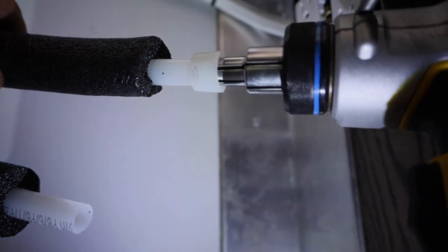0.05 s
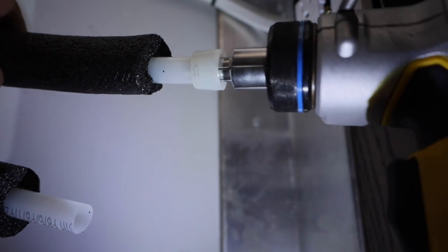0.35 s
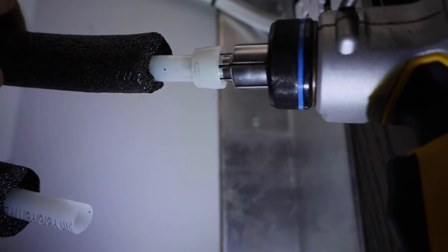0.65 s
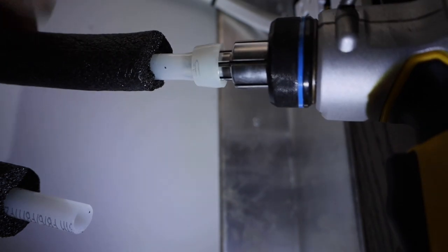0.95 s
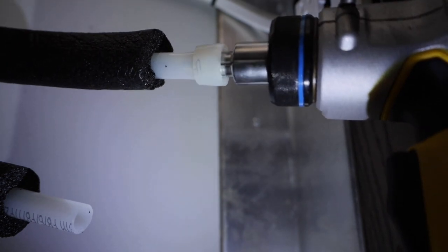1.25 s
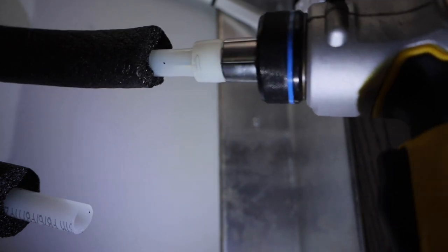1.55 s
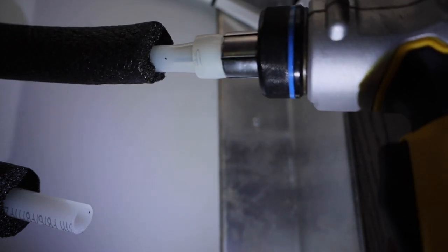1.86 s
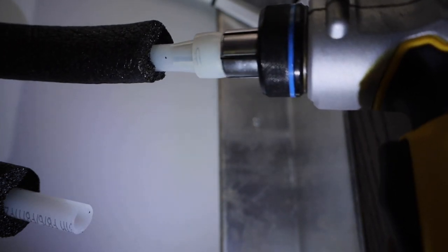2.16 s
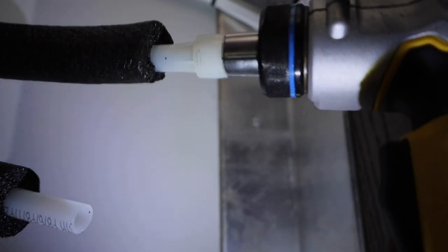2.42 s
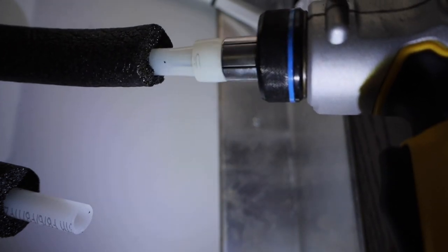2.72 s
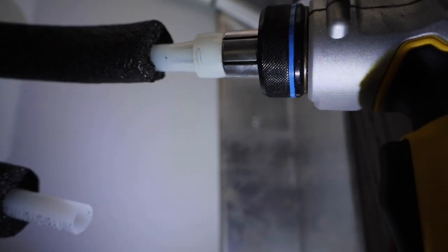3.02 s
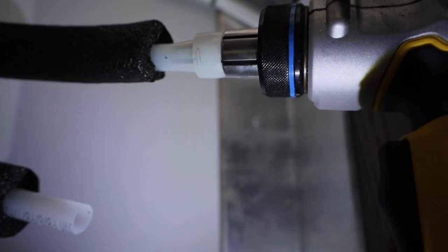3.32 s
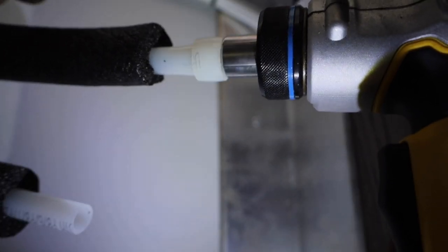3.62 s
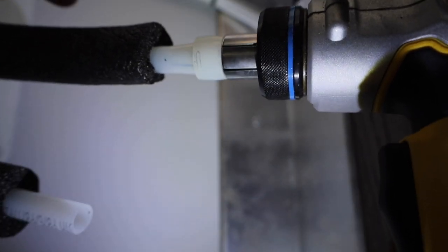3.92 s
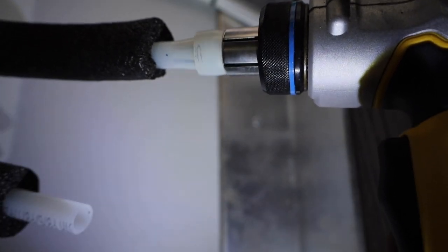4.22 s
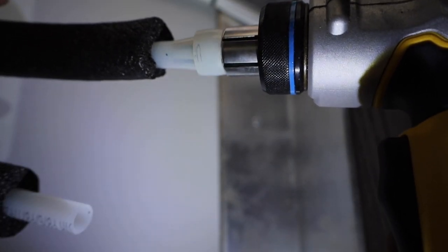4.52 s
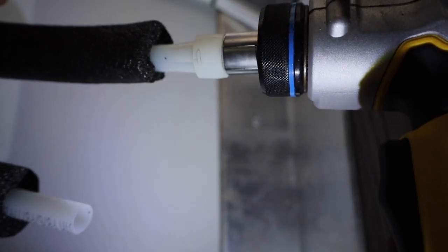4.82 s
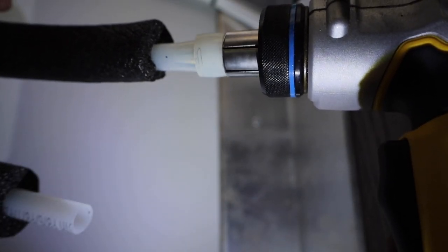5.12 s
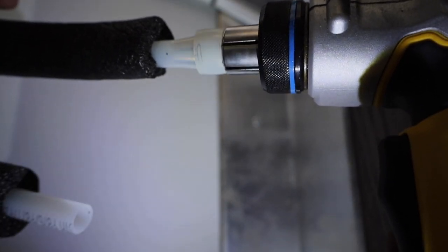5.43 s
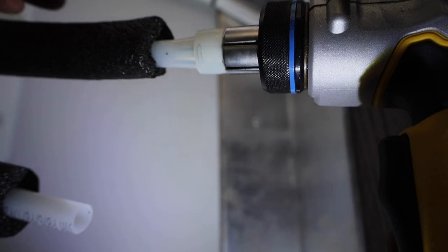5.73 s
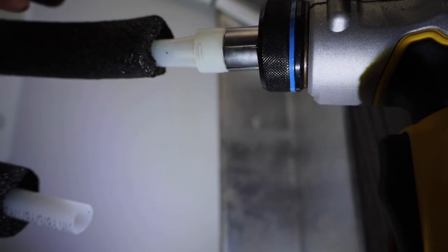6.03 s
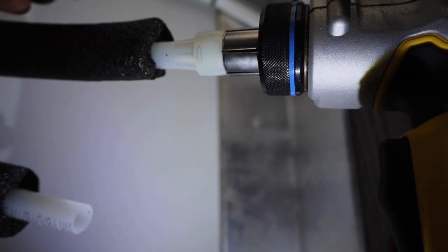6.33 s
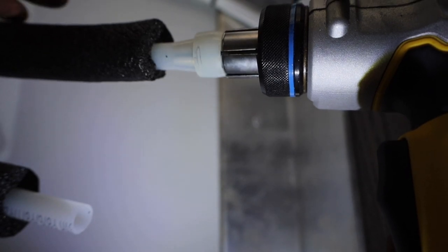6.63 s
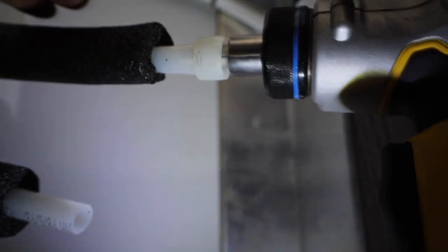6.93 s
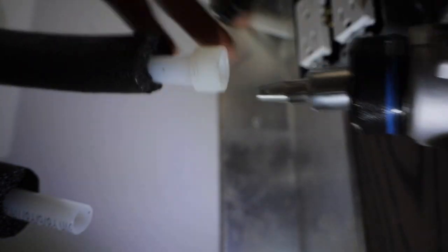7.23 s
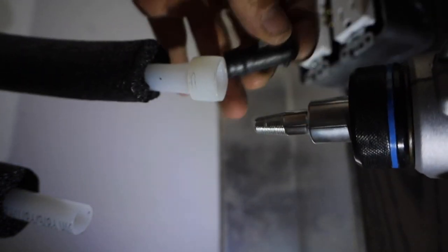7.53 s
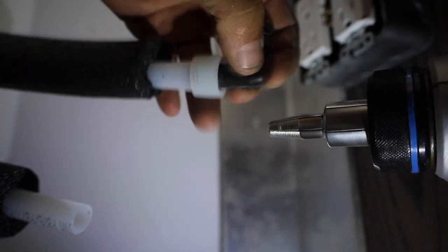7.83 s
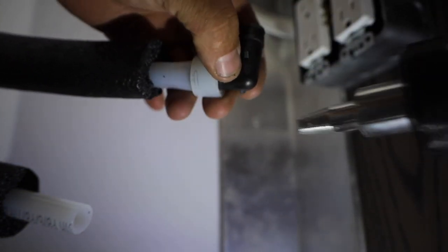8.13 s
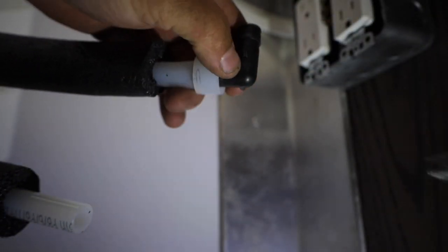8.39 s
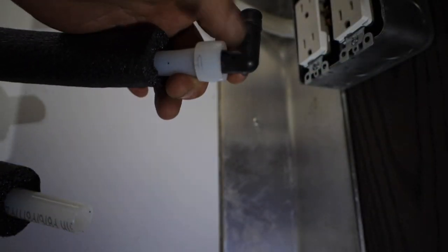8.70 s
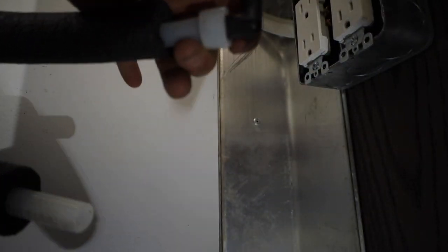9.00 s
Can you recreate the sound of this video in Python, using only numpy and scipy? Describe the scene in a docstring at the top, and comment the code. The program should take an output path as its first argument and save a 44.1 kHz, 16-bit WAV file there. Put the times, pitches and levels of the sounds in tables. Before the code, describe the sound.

A cordless expander stretches a plastic pipe end in a workshop, close to the microphone. Its geared motor whines, sags and grinds under load, then the steel jaws snap shut and the pitch recovers, seven snaps in all. The motor stops abruptly with a click and the tool slides out. The pipe thumps, and a fitting is pushed in with knocks, rubbing and faint squeaks over a low room hum.

```python
"""A cordless expander stretching a plastic pipe end in a workshop, close to one microphone.
The tool is already running: its geared motor sags and grinds as the cam spreads the jaws, then they
snap shut and the motor runs free again, seven snaps in all, with the odd knock of the pipe.
Near seven seconds the motor is braked and the tool slides out. The pipe is bumped and a fitting
is pushed in, rubbing and squeaking, while the low hum of the room comes up."""
import sys
import numpy as np
from scipy import signal
from scipy.fft import rfft, irfft, next_fast_len
from scipy.io import wavfile

SR = 44100
rng = np.random.default_rng(int(sys.argv[2]) if len(sys.argv) > 2 else 0)


def to_wav(sig):
    """Store sig (one row per channel, or 1-D mono) as 16-bit WAV at the path in sys.argv[1].

    Samples outside -1..1 are clipped; the rate is SR.
    """
    pcm = np.clip(np.atleast_2d(sig), -1, 1) * 32767
    pcm = np.round(pcm).astype(np.int16)
    wavfile.write(sys.argv[1], SR, pcm.T)  # frames by channels


N = 399410
TIME = np.arange(N) / SR
FREE_HZ, STOP_S = 304.6, 6.976  # shaft speed running free; when the trigger is let go

# Turns of the cam. Each row: jaws meet the pipe and jaws snap shut in seconds, shaft speed lost early
# and late in the stretch in Hz, then trims in dB for the drive, the loaded whine and the snap.
STROKES = [(-0.6, 0.0434, 35.2, 34.93, -0.5, 0.5, -5), (0.285, 1.205, 53.5, 40.12, 0.5, -1, -5),
           (1.478, 2.372, 54.16, 47.44, -1.0, 1, -5), (2.777, 3.5009, 42.52, 44.02, -0.57, -0.5, -5),
           (3.95, 4.6146, 35.9, 43, -0.05, 1.5, -3.5), (5.094, 5.72, 32.35, 41.9, 0, 0.5, -4.5),
           (6.221, 6.822, 32.32, 41.74, 0.5, -0.4, -5.5)]
# Spectrum of a hard snap. Each row: frequency in Hz, relative level in dB.
SNAP = [(60, -31.5), (150, -17.5), (300, -1.5), (600, -9.5), (1300, -2.5), (2500, 0), (4000, 5),
        (6500, 5.5), (9000, -3), (12000, -9.5), (16000, -19)]


def motor(dip_db=4.5, dip_s=0.066, whine_dip_db=7, whine_dip_s=0.097, brake_s=0.024, fade_s=0.032):
    """The geared drive: briefly quiet after each snap, its whine last to return, then braked hard."""
    speed, load, since_snap = strain()
    _, snap_s, _, _, drive_db, whine_db, _ = np.transpose(STROKES)
    stroke = np.searchsorted(snap_s[:-1], TIME)
    braking = np.maximum(TIME - STOP_S, 0)
    speed = speed * np.exp(-braking / brake_s)
    turns = np.cumsum(speed) / SR
    effort_db = drive_db[stroke] - 0.58 + 0.97 * since_snap  # louder as the cam presses on
    fade = np.exp(-(braking / fade_s) ** 2)
    level = amp(effort_db - dip_db * np.exp(-(since_snap / dip_s) ** 4)) * fade
    whine_gain = amp(whine_db[stroke] * load - whine_dip_db * np.exp(-(since_snap / whine_dip_s) ** 4))
    return level * (whine_gain * whine(speed, turns, load) + whistles(turns, load) + rattle(turns, load))


def strain(full_load_sag_hz=42, bite_s=.2, let_go_s=.016, recover_s=.033):
    """The pipe drags the motor down until the cam lets go: shaft speed, load, seconds since a snap."""
    sag, load, since_snap = np.zeros(N), np.zeros(N), TIME + 1
    for meet_s, snap_s, early_hz, late_hz, *_ in STROKES:
        grip = 1 - np.exp(-(np.maximum(TIME - meet_s, 0) / bite_s) ** 2)
        release = np.exp(-np.maximum(TIME - snap_s + let_go_s, 0) / recover_s)
        drag = np.interp(TIME, [meet_s, snap_s], [early_hz, late_hz]) * grip * release
        sag += drag
        load += np.minimum(drag / full_load_sag_hz, 1) * (TIME < snap_s)
        since_snap = np.where(TIME >= snap_s, TIME - snap_s, since_snap)
    return FREE_HZ - sag, load, since_snap


def whine(speed, turns, load, free_lift_db=1, buzz_lift_db=2, wander_db=1.23, flutter=0.18):
    """Motor and gear tones follow the shaft; straining teeth mesh unevenly and smear the high ones."""
    # Whole multiples come from the motor, the others from the gears.
    # Each row: multiple of shaft speed, relative level in dB running free and under load.
    orders = [(1, -43, -44), (1.74, -71, -44), (2, -42, -66), (2.36, -68, -47), (3, -41, -46),
              (3.61, -47, -35), (4, -38, -44), (4.47, -43, -45), (5, -34, -34), (6, -47, -43),
              (7.12, -55, -40), (8.56, -35.5, -36), (10.55, -40, -41), (10.96, -41, -41), (12, -39, -41),
              (12.25, -67, -40), (13, -40, -43), (14.34, -53, -43), (15, -36, -32), (15.3, -53, -42),
              (15.72, -43, -37), (16.72, -51, -37), (17.11, -52, -36), (17.725, -34, -25), (18, -43, -46),
              (20, -38, -38), (21, -40, -45), (22, -45, -55), (23.23, -64, -40), (24.28, -72, -34),
              (24.78, -64, -38), (25, -46, -40), (25.88, -71, -39), (26.28, -58, -37), (30, -42, -43),
              (31, -46, -46), (34, -45, -43), (34.84, -69, -40), (35.45, -80, -42), (36, -49, -47),
              (38, -49, -48), (41, -51, -51), (43.39, -82, -41), (49, -52, -60)]
    # The weaker motor harmonics in between. Each row: frequency in Hz, relative level in dB.
    buzz = [(2000, -48), (4500, -47.5), (7000, -52), (10000, -51.5), (12000, -52), (15500, -55.5)]
    out, shaft_hz = np.zeros(N), np.arange(240, 320)
    rough_rad = 0.11 + 0.18 * load
    gliding = np.sin(np.pi * load)  # tones break up while they sweep across many small modes
    smear_rad = .011 * load + .022 * gliding
    strained = load ** 0.49
    depth = np.minimum(TIME / STOP_S, 1)  # the head works deeper into the pipe
    for order, free_db, loaded_db in orders:
        geared = abs(order - round(order)) > .1
        multiple = order if geared else round(order)
        shallow, deep = (np.interp(speed, shaft_hz, singing(order * shaft_hz, end)) for end in (0, 1))
        ring = shallow + (deep - shallow) * depth
        ring /= np.sqrt(np.average(ring ** 2, weights=load > .85))  # rms gain 1 near full load
        level = amp(free_db + free_lift_db) * (1 - load) + amp(loaded_db) * strained * ring
        breakup_db = gliding * (5 if geared else 1.5)
        level *= amp(wander_db * waver(2.01) + breakup_db * (waver(35) - .5))
        slip = rough_rad * waver(70) + geared * order * smear_rad * waver(450)
        level *= 1 + flutter * waver(35)
        out += level * np.cos(2 * np.pi * (multiple * turns + rng.random()) + slip)
    strong = [round(order) for order, *_ in orders if abs(order - round(order)) <= .1]
    lift, jitter = amp(buzz_lift_db * load), rough_rad * waver(50)
    for k in np.setdiff1d(np.arange(7, 60), strong):
        level = lift * amp(read(buzz, k * FREE_HZ))
        out += level * np.cos(2 * np.pi * (k * turns + rng.random()) + jitter)
    return np.sqrt(2) * out


def singing(hz, depth):
    """Gain of a tone sweeping through sharp modes of head and gearbox, at a depth (0-1) in the pipe."""
    # Each row: centre in Hz, width in Hz, peak in dB, dB gained at full depth.
    modes = [(939, 45, 7.5, 0.5), (1369, 86, 13, 2.5), (3880, 45, 11, -5.5), (4638, 85, 11, -0.5),
             (6350, 60, 7, -0.5), (6560, 90, 5.5, 0), (9170, 110, -2, 6)]
    return amp(sum(resonance(hz, centre, width, db + depth * gain) for centre, width, db, gain in modes))


def whistles(turns, load):
    """Gear teeth whistle as soon as they bear load: narrow noise bands riding on the shaft speed."""
    # Each row: multiple of shaft speed, width in Hz, relative level in dB.
    bands = [(24.2, 280, -39), (35, 340, -38.5), (43.9, 380, -42.5)]
    out = np.zeros(N)
    for order, width, db in bands:
        phase = 2 * np.pi * order * turns
        out += amp(db) * (waver(width) * np.cos(phase) + waver(width) * np.sin(phase))
    return load ** 0.33 * out


def rattle(turns, load, free_db=-25, loaded_db=-20, throb=0.11, flicker_db=1):
    """Gear teeth chatter in the housing, bunched once a shaft turn, and grind brighter under load."""
    # Chatter running free and under load. Each row: frequency in Hz, relative level in dB.
    free_spectrum = [(40, -60), (110, -30.5), (230, -15.5), (450, -13.5), (700, -8.5), (1150, -3),
                     (1800, -8.5), (3200, -4.5), (5000, -8.5), (8000, -13), (8800, -17), (10300, -17.5),
                     (11500, -23.5), (15500, -32)]
    loaded_spectrum = [(40, -59), (110, -32), (250, -27.5), (450, -16), (700, -9.5), (1250, -7), (2600, -6),
                       (4400, -1.5), (5400, -7.5), (6700, -4.5), (8000, -10.5), (9400, -16), (12000, -17),
                       (15500, -29)]
    # Housing resonances. Each row: centre in Hz, width in Hz, peak in dB.
    housing = [(320, 127, 4.5), (970, 180, -4), (1215, 480, 5.5), (1886, 200, 3.5), (3230, 109, 3),
               (3860, 400, -1), (6560, 350, 2)]
    beat = (1 + throb * np.cos(2 * np.pi * turns)) * amp(flicker_db * waver(160))
    free = colour(beat * grains(N, spread_db=0), free_spectrum, peaks=housing)
    loaded = colour(beat * grains(N, spread_db=3.5), loaded_spectrum, peaks=housing)
    share = np.clip(load, 0, 1)
    return amp(free_db) * np.sqrt(1 - share) * free + amp(loaded_db) * np.sqrt(share) * loaded


def brake(click_db=-24, click_s=.005, catch_s=6.985, catch_db=-15.5):
    """The trigger clicks, then the brake catches the gears and the gearbox rings."""
    # Gearbox modes. Each row: frequency in Hz, relative level in dB, seconds to fall 60 dB.
    gearbox = [(1170, 4, 0.08), (1320, -6, 0.081), (600, -23, .1)]
    out, t = np.zeros(N), np.arange(SR // 20) / SR
    add(out, STOP_S, amp(click_db) * colour(rng.standard_normal(len(t)), SNAP) * np.exp(-t / click_s))
    add(out, catch_s, amp(catch_db) * ringing(gearbox))
    return out


def jaws(crack_db=6, crack_s=0.0012, ring_db=-3, rebound_s=0.0061, rebound_db=-9, reset_db=-33):
    """Steel jaws slam shut, rebound once and ring briefly; a light scrape follows as the head resets."""
    out, t = np.zeros(N), np.arange(SR // 20) / SR
    ring_t60 = [(250, 0.38), (1000, 0.048), (5000, 0.071), (13000, 0.056)]
    for _, start, *_, db in STROKES:
        crack = colour(rng.standard_normal(len(t)), SNAP) * np.exp(-t / crack_s)
        crack = low_cut(crack, hz=220)  # the crack carries little bass
        add(out, start, amp(db + crack_db) * crack)
        add(out, start + rebound_s, amp(db + rebound_db) * crack)
        add(out, start, amp(db + ring_db) * burst(SNAP, ring_t60))
        scrape = colour(grains(SR // 40, spread_db=9), [(1000, -1), (8000, -6), (13000, 5), (16000, -20)])
        add(out, start + 0.078, amp(reset_db) * scrape * np.hanning(len(scrape)))
    return out


def handling(direct=0.37, direct_s=0.0072):
    """Knocks ring the pipe, and so do the tiny slips of plastic rubbing on steel, plastic and skin."""
    # Pipe, tool and fitting knock. Each row: start in seconds, level in dB, tilt in dB per octave.
    knocks = [(1.382, -30, -1.5), (4.95, -29.5, 0), (5.064, -35, 2), (7.158, -39.5, 3.5), (7.27, -29.5, -3),
              (7.627, -30.5, -2.5), (7.675, -30.5, -2.5), (7.817, -38, 1.5), (7.863, -20, -1.5),
              (7.871, -16.5, 2.1), (8.204, -34, -3), (8.634, -53, -4)]
    # Rubs. Each row: start and length in seconds, level in dB, tilt in dB per octave.
    rubs = [(7.018, 0.1, -31, -1), (7.12, 0.04, -30, -2.5), (7.332, 0.016, -45.5, 6),
            (7.639, 0.11, -38.5, -1.5), (7.755, 0.089, -45.5, 3), (7.854, 0.021, -24, 2.5),
            (7.924, 0.12, -45, 7), (8.194, 0.14, -46.5, 7), (8.276, 0.035, -37.5, 5.5),
            (8.329, 0.2, -56, 7), (8.654, 0.4, -51, 0.5)]
    # Spectrum of a knock. Each row: frequency in Hz, relative level in dB.
    spectrum = [(50, -38), (130, 0), (220, -7.5), (320, -0.5), (450, -2.5), (900, 5.5), (1500, 1),
                (2400, -2.5), (3500, -11), (5500, -11.5), (9000, -24.5), (16000, -38)]
    # Its decay. Each row: frequency in Hz, seconds to fall 60 dB.
    t60s = [(150, 0.78), (320, 0.32), (1000, 0.21), (2500, 0.12), (6000, 0.11), (14000, .05)]
    # Pipe resonances. Each row: centre in Hz, width in Hz, peak in dB.
    pipe = [(319, 39, 13.5), (603, 60, 3), (1050, 240, 1), (1320, 90, 3.5), (2250, 100, 2.5)]
    out, t = np.zeros(N), np.arange(SR // 2) / SR
    attack = 1 + direct * np.exp(-t / direct_s)
    for start, db, tilt_db in knocks:
        add(out, start, amp(db) * burst(spectrum, t60s, tilt_db, pipe) * attack)
    for start, length, db, tilt_db in rubs:
        count = int(length * SR)
        slips = unit(grains(SR, spread_db=11)[:count]) * signal.windows.tukey(count, .5)
        body = burst(spectrum, t60s, tilt_db, pipe)
        add(out, start, amp(db) * signal.fftconvolve(slips, body / np.linalg.norm(body)))
    return out


def bumps():
    """The pipe bumps its support, which rings low."""
    # Each row: start in seconds, level in dB.
    blows = [(1.29, -45), (2.501, -39), (3.62, -42), (4.72, -39), (7.2694, -11), (7.31, -18.5),
             (7.872, -25.5)]
    # Modes of the support. Each row: frequency in Hz, relative level in dB, seconds to fall 60 dB.
    support = [(91.6, -6, 0.44), (111.6, -3.5, 0.58), (153.96, -2, 0.18), (198, -12, .16), (345, -33, 0.19),
               (629, -17, 0.16)]
    out = np.zeros(N)
    for start, db in blows:
        add(out, start, amp(db) * ringing(support))
    return out


def squeaks(roughness=0.046):
    """The fitting squeaks faintly going in: short tones of unsteady pitch."""
    # Each row: start and length in seconds, pitch in Hz, level in dB.
    tones = [(7.655, 0.037, 13580, -58), (8.26, 0.22, 2190, -58), (8.631, 0.019, 2780, -53.5),
             (8.668, 0.11, 2380, -60), (8.735, 0.034, 5330, -53)]
    out = np.zeros(N)
    for start, length, hz, db in tones:
        count = int(length * SR)
        pitch = hz * (1 + roughness * waver(900)[:count])
        add(out, start, amp(db) * unit(np.sin(2 * np.pi * np.cumsum(pitch) / SR) * np.hanning(count)))
    return out


def room(hum_hz=86, hum_db=-43, air_db=-50, hum_under_db=19, air_under_db=6, swell_s=0.56):
    """A wavering hum in soft room tone; both creep up while the tool runs and swell once it stops."""
    # Room tone. Each row: frequency in Hz, relative level in dB.
    spectrum = [(15, -59), (25, -29), (53, -17), (86, -11.5), (164, -14.5), (349, -17.5), (399, -21),
                (945, -26), (2700, -29.5), (3440, -31), (7910, -34.5), (15500, -41)]
    hum = unit((1 + .2 * waver(7)) * np.sin(2 * np.pi * hum_hz * TIME + .25 * waver(30)))
    air = colour(rng.standard_normal(N), spectrum)
    creep = amp(-1.5 * np.maximum(STOP_S - TIME, 0))  # rises 1.5 dB a second
    under = np.exp(-np.maximum(TIME - STOP_S, 0) / swell_s)
    return creep * (amp(hum_db - hum_under_db * under) * hum + amp(air_db - air_under_db * under) * air)


def burst(spectrum, t60s, tilt_db=0, peaks=()):
    """A blow into many close modes; each band dies at its own speed."""
    noise = colour(rng.standard_normal(SR // 2), spectrum, tilt_db, peaks)
    hz, t, bands = signal.stft(noise, SR, nperseg=256)
    decay = np.exp(-np.log(1000) * t / read(t60s, hz)[:, None])
    return signal.istft(bands * decay, SR, nperseg=256)[1][:len(noise)]


def ringing(modes, soft_s=0.003):
    """Damped modes after a soft blow."""
    t = np.arange(SR // 2) / SR
    ring = sum(amp(db - 60 * t / t60) * np.sin(2 * np.pi * hz * t) for hz, db, t60 in modes)
    return (np.exp(-t / soft_s) - 1) * ring


def colour(x, points, tilt_db=0, peaks=()):
    """Gives x a spectrum, a tilt per octave and resonances, at rms 1."""
    size = next_fast_len(len(x))
    hz = np.fft.rfftfreq(size, 1 / SR)
    db = read(points, hz) + tilt_db * np.log2(hz + 1) + sum(resonance(hz, *peak) for peak in peaks)
    return unit(irfft(rfft(x, size) * amp(db), size)[:len(x)])


def resonance(hz, centre, width, peak_db):
    """The bell curve of one mode, in dB."""
    return peak_db / (1 + (2 * (hz - centre) / width) ** 2)


def grains(count, spread_db):
    """Dense tiny impacts of uneven size."""
    sign, size = rng.standard_normal((2, count))
    return sign * amp(spread_db * size)


def waver(rate):
    """A random drift of rms 1 that changes course rate times a second."""
    steps = rng.standard_normal(2 ** 14)
    return unit(np.interp(TIME * rate, np.arange(len(steps)), steps))


def low_cut(x, hz):
    """Second-order high-pass."""
    return signal.sosfilt(signal.butter(2, hz, "high", fs=SR, output="sos"), x)


def read(points, hz):
    """Reads (Hz, value) points on a log-frequency axis."""
    f, value = np.transpose(points)
    return np.interp(np.log(hz + 1), np.log(f + 1), value)


def add(mix, start, sound):
    """Mixes a sound in at start seconds."""
    part = mix[round(start * SR):][:len(sound)]
    part += sound[:len(part)]


def amp(db):
    """Decibels to gain."""
    return 10 ** (np.asarray(db) / 20)


def unit(x):
    """Scales to rms 1."""
    return x / np.sqrt(np.mean(abs(x) ** 2) + 1e-20)


def scene():
    """Tool, pipe and workshop reach one close microphone, alike in both channels."""
    return np.tile(motor() + brake() + jaws() + handling() + bumps() + squeaks() + room(), (2, 1))


def record(dry, low_cut_hz=50, edge_hz=16000):
    """The microphone drops the deepest bass, the snaps overload it, and the top treble is cut off."""
    clipped = np.clip(low_cut(dry, low_cut_hz), -1, 1)
    band_limit = signal.firwin(511, edge_hz, window=("kaiser", 9), fs=SR)
    return signal.oaconvolve(clipped, band_limit[None], "same")


dry = scene()
out = record(dry)
to_wav(out)
```